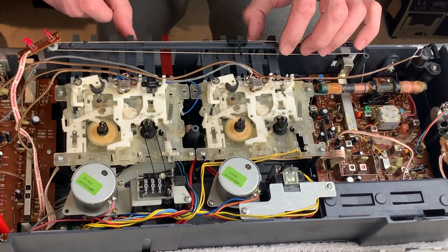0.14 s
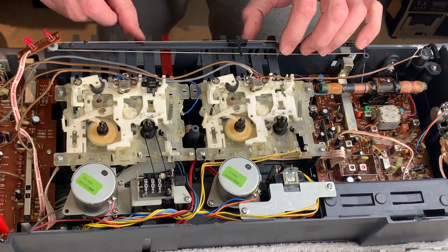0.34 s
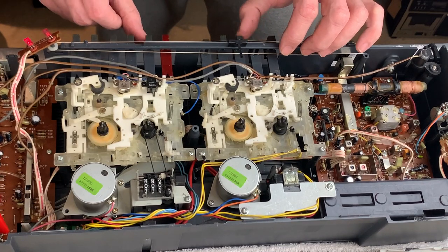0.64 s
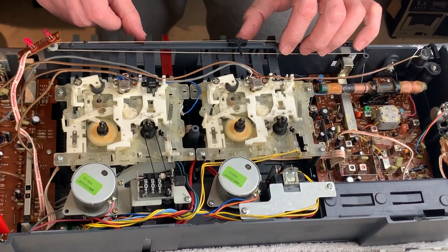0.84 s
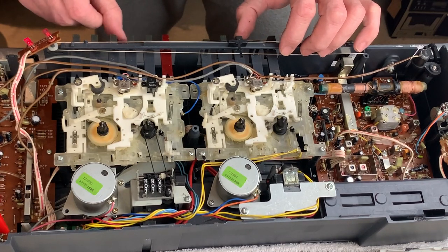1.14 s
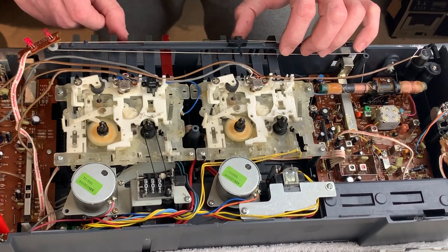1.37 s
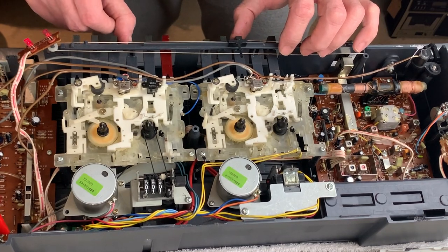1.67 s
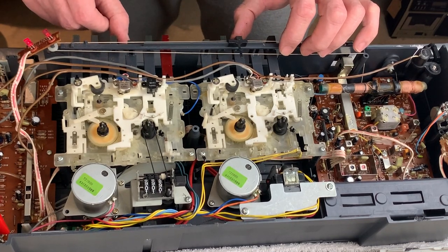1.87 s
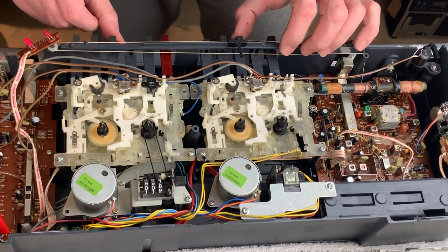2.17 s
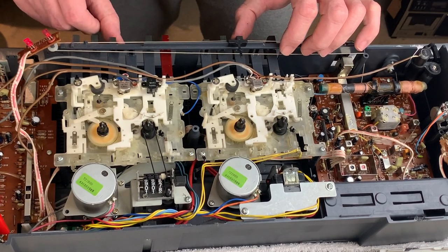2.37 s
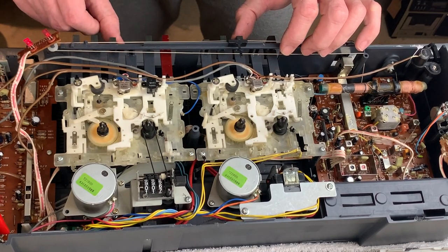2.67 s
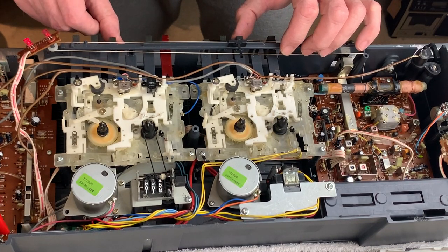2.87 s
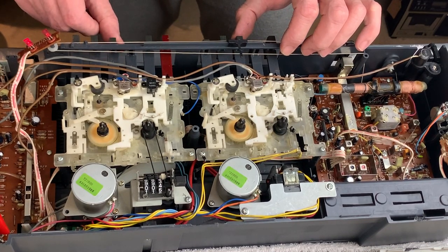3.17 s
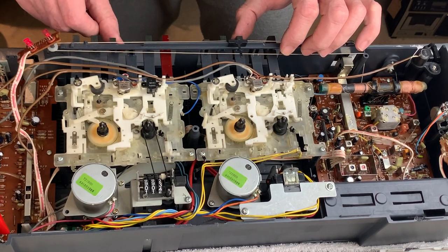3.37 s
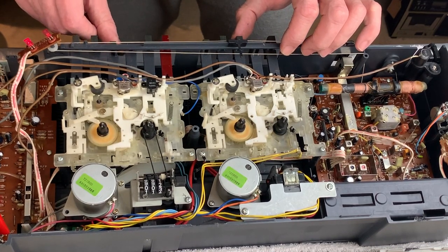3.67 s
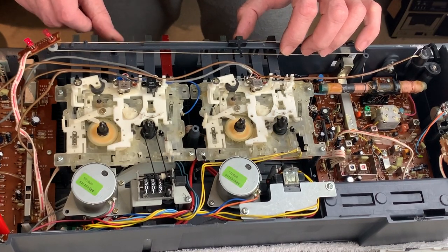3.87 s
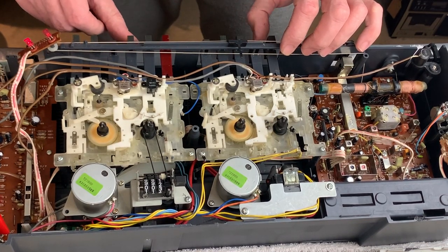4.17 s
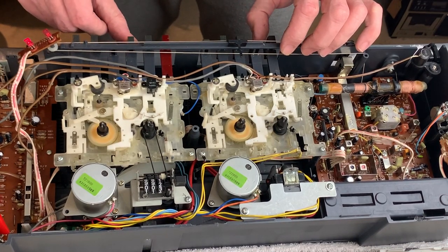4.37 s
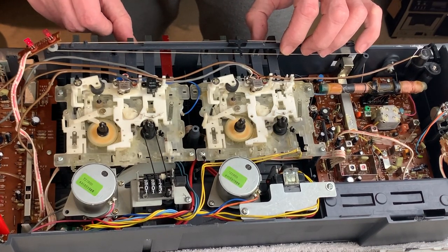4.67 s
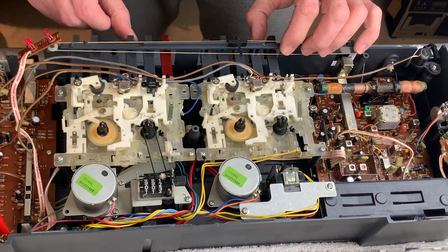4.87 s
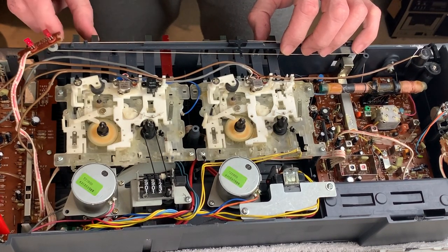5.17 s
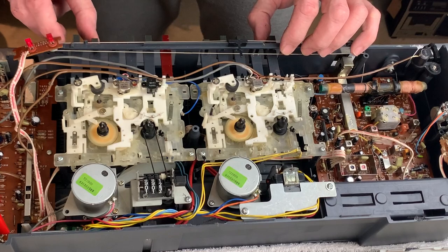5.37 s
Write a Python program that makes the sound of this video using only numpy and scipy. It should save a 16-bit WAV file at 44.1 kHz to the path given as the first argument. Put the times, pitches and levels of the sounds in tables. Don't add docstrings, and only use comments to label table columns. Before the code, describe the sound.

Inside an opened cassette deck, a faint motor whine runs while keys are tapped, then three sharp plastic-metal latch clacks sound, the second loudest.

```python
import sys
import numpy as np
from scipy import signal
from scipy.fft import rfft, irfft, next_fast_len
from scipy.io import wavfile
from scipy.ndimage import map_coordinates

SR = 44100
rng = np.random.default_rng(int(sys.argv[2]) if len(sys.argv) > 2 else 0)


def store_pcm(level_fs):
    pcm = np.round(np.clip(level_fs, -1, 1) * 32767).astype(np.int16)
    wavfile.write(sys.argv[1], SR, np.atleast_2d(pcm).T)


def field_ratio(decibels):
    return 10 ** (np.asarray(decibels, dtype=float) / 20)


N = 243211

# start in seconds, snap peak in dB, plastic in dB,
# chassis in dB, decay t60 in seconds.
ENGAGE = [(1.395, -56, -70, -55.5, 1), (1.4155, -50, -68.5, -51.5, 0.043), (1.4285, -36.5, -57, -56, 0.016),
          (1.4895, -54.5, -63.5, -44.5, 0.026), (1.4975, -38, -64.5, -53.5, 0.016),
          (1.526, -54, -63, -64, .06), (1.553, -37, -42.5, -44, 0.047), (1.5768, -10, -36, -30.5, 0.016),
          (1.584, -32, -34, -37.5, .062), (1.60, -46.5, -50.5, -48, 0.044), (1.63, -50, -56, -49, 0.05)]
RELEASE = [
    (3.570, -38.5, -36.5, -55, .15),
    (3.576, -29.5, -29, -45, .04),
    (3.579, -15, -21, -25.5, .04),
    (3.5815, 3, -18.5, -10.5, .02),
    (3.588, -12.5, -22.5, -18.5, .055),
    (3.6175, -16, -34.5, -36.5, .02),
    (3.631, -30.5, -40, -38, 0.036),
    (3.648, -36, -45.5, -43, 0.036),
    (3.680, -39, -51.5, -49.5, 0.06),
]
SWITCH = [
    (5.239, -54, -80.5, -51, 0.028),
    (5.312, -39, -52, -69, .14),
    (5.3205, -20, -36, -43, .045),
    (5.3272, -0.5, -23, -11, .02),
    (5.337, -20, -24, -43, .055),
    (5.36, -38, -47, -51, .04),
    (5.403, -41, -47, -48, .04),
    (5.4875, -36, -55, -56, 0.024),
]
# frequency in Hz, level in dB, decay t60 in seconds.
ENGAGE_RING = [(653, -48.5, 0.095), (757, 11, 0.12), (900, 8, .06), (1110, 3, 0.07), (1370, 6, 0.071),
               (1597, 0, 0.099), (1950, -42, 0.035), (2150, -23, .05)]
RELEASE_RING = [(614, -12.5, .13), (760, -17, 0.084), (850, -7, 0.19), (998, 1.5, 0.091), (1080, 0, 0.057),
                (1136, -5, .13), (1305, 6, 0.051), (1550, 1, 0.09), (1610, -2.5, 0.12), (1850, -2.5, 0.089),
                (2030, -13.5, 0.15)]
SWITCH_RING = [(584, -6, 0.13), (765, -11.5, 0.16), (863, -8, 0.17), (1050, -3.5, 0.089), (1220, -9, 0.18),
               (1505, -6, 0.05), (1574, 10, 0.035), (1680, 9, 0.04), (2180, -13, 0.12)]
# frequency in Hz, level in dB.
SNAP = [(3500, -25), (5000, -10), (6800, 0.5), (8500, -5), (10200, 0.5), (12000, -3.5), (14000, 5),
        (15400, -5), (16000, -13.5), (16800, -31.5)]
DULL = [(3500, -14), (5000, -11.5), (6500, 4), (8000, -13), (10500, -11), (12500, -19), (14500, -14.5),
        (16500, -26.5)]
PLASTIC = [(1700, -25.5), (2100, -12.5), (2500, -10.5), (2950, -2), (3400, -2.5), (4000, -3), (4900, -7.5),
           (5500, -11), (6500, -28)]
# frequency in Hz, level in dB.
WIDE = [(200, -19), (600, -8), (1500, -5.5), (2400, -1), (5000, -3.5), (7000, -7), (10000, -7.5),
        (16000, -11)]
# start in seconds, tick peak in dB, knock in dB, knock frequency in Hz,
# decay t60 in seconds.
TOUCH = [
    (.2815, -48, -48, 950, .04),
    (.3714, -80, -56, 736, 0.033),
    (.5043, -60.5, -56, 850, .041),
    (.6165, -48.5, -46, 907, 0.089),
    (.6414, -50, -50.5, 740, 0.038),
    (.9344, -63, -57, 900, 0.07),
    (1.1814, -60, -51, 640, 0.049),
    (4.7698, -49.5, -49.5, 1216, .11),
    (4.8084, -70, -45.5, 1320, .035),
]
RUB = [
    (.995, -73.5, -50.5, 1000, 0.058),
    (.468, -81.5, -51.5, 854, 0.15),
    (3.342, -95, -53.5, 770, 0.055),
    (4.405, -80, -63, 2900, 0.34),
    (4.462, -71, -57, 770, 0.13),
    (4.5, -86, -54.5, 1110, .1),
    (4.765, -64.5, -51.5, 773, .16),
    (4.815, -73.5, -57, 757, 0.11),
    (5.235, -70, -55, 1190, 0.21),
]
# frequency in Hz, level in dB, decay t60 in seconds.
SPRING = [(1393, -50, .7), (822, -56, .6), (720, -58, .5)]
# start in seconds, peak in dB, sharpness in dB, decay t60 in seconds, shudder in dB.
PUSH = [
    (0.306, -50, 2.5, 0.062, -84.5),
    (0.488, -48, -18.5, 0.11, -77.5),
    (.649, -48, -11, .19, -78),
    (1.011, -60.5, -8, 0.094, -79.5),
    (1.46, -55, -10, 0.083, -65),
    (1.643, -42, -4.5, 0.073, -78),
    (3.584, -29.5, -3, 0.14, -68.5),
    (4.8, -62, 4, .14, -78),
    (5.333, -32.5, -5.5, 0.1, -62),
]
# frequency in Hz, level in dB at sharpness 0.
BENCH_UPPER = [(188, -6), (300, -7), (390, -16)]
# start
# in seconds, peak in dB, frequency in Hz, decay t60 in seconds.
LEAN = [(1.4, -58, 60, .15), (1.54, -55, 62, .15), (.02, -64, 305, 0.097), (.39, -58, 55, .06),
        (1.689, -50.5, 78, 0.1), (2.752, -60.5, 50, 0.1), (2.84, -50.5, 52, 0.18), (3.091, -60, 42, 0.12),
        (3.252, -56.5, 48, .096), (3.665, -48, 95, 0.11), (3.72, -48, 70, .064), (5.34, -42.5, 62, 0.24),
        (5.439, -68, 70, 0.16)]
# time in seconds, transport load from 0 to 1, brush drag in dB.
MOTOR = [(0, 0.18, -5.5), (.5, 0.23, -6), (.72, 0.17, -3), (1.04, 0.3, 0), (1.25, 0, -2.5), (1.55, 0.2, 1),
         (1.9, 0.81, 1.5), (2.6, 0.85, -0.5), (2.85, 1.1, 0.5), (3.05, 0.7, 2), (3.58, 1, -0.5),
         (3.75, 0.3, 3), (3.9, 0, -1), (4.7, 0.06, -3), (5.2, 0.22, -1.5), (5.37, 0.86, 2), (5.51, 0.1, -1)]
# time in seconds, commutator rate in Hz.
SPEED = [(0, 227), (.5, 227), (.9, 224.5), (3.5, 224.5), (4.3, 224.5), (4.9, 224), (5.1, 227), (5.51, 227)]
# multiple of the commutator rate, level in dB rms.
ORDERS_DB = [(7, -74.5), (7.26, -77.5), (8, -73.5)]
FLICKER_DB = [(12.4, -92), (13.07, -92), (13.75, -95), (14.7, -94), (16, -98), (16.7, -93), (18, -100)]
# frequency in Hz, width in Hz, level in dB.
CAN = [(1086.7, 43, 1), (1350, 70, -1), (1597, 70, -0.5), (1683, 74, -1.5), (1829, 120, -5.5),
       (2767, 170, -11.5), (3166, 270, -17), (3822, 400, -19.5)]
# frequency in Hz, density in dB per Hz.
GEARS = [(480, -30), (600, -3), (680, -0.5), (800, -0.5), (920, -4.5), (1000, -0.5), (1080, -3),
         (1200, -33)]
RUMBLE = [(12, -35), (20, -13.5), (43, 4.5), (64, 0), (130, -1.5), (233, -9.5), (311, -10.5), (434, -17),
          (550, -16.5), (720, -43.5), (1210, -120)]
AIR = [(1500, -20), (2200, 0), (4000, -3), (6000, -7), (7800, -6), (8250, -36), (9000, -36), (9250, -5),
       (12700, -7), (13000, -36), (14100, -36), (14350, -6), (15750, -6), (16000, -50)]
# frequency in Hz, t60 in seconds.
ROOM = [(100, 0.33), (600, 0.19), (2000, .17), (8000, 0.14), (16000, 0.04)]
# frequency in Hz, left-right likeness.
DIFFUSE = [(60, .85), (300, 0.73), (700, 0.15), (2000, 0.028), (7000, -.2), (15000, -0.11)]
# frequency in Hz, phase in radians by which left leads.
LEAD = [(0, 0), (350, .2), (700, -.2), (1250, -.8), (1600, -.3), (1800, .6), (3200, 1.2), (4700, 3.1),
        (6700, 4.9), (8200, 4), (10200, 7.3), (12000, 5.4), (16000, .4)]
# frequency in Hz, left-right balance in dB.
SIDEWAYS = [(60, -1.5), (200, 2.5), (380, 1.5), (700, 5), (1200, 1), (1700, 8), (2400, -0.5), (4500, -10),
            (8000, 0), (15000, -0.5)]
# frequency in Hz, width in Hz, depth in dB.
NOTCHES = [(8800, 500, -12), (13550, 780, -18.5)]

FIFTH_DB, SIXTH_DB, BRUSH_DB, GEAR_DB = -68, -69.5, -64, -71
FIFTH_GAINS_DB, SIXTH_GAINS_DB, GEAR_GAINS_DB = 11, -6.5, 7
SIXTH_PER_DRAG = 0.91
RISE_S, RISE_GROWS, LONGEST_RISE_S = .001, 1.5, 0.024
CHASSIS_LOW_HZ, CHASSIS_HIGH_HZ = 520, 2125
SPRING_S = 3.59
BENCH_HZ, UPPER_T60_S, RISE_CYCLES = 117, 0.096, 0.42
SOFT_LEAD_S = .03
RUMBLE_DB, SHUDDER_RISE_S, SHUDDER_T60_S = -73.5, 0.055, .8


def unit(x):
    return x / np.sqrt(np.mean(x ** 2) + 1e-20)


def peak(x):
    return x / np.max(np.abs(x))


def along(points, hz):
    f, v = np.transpose(points)
    return np.interp(np.log(hz + 1), np.log(f + 1), v)


def curves(rows):
    s, *cols = np.transpose(rows)
    return [np.interp(np.arange(N) / SR, s, c) for c in cols]


def wobble(rate):
    n = np.arange(0, N + 16, 16)
    knots = rng.standard_normal(int(N * rate / SR) + 4)
    return np.interp(np.arange(N), n, map_coordinates(knots, [n * rate / SR]))


def filtered(x, response):
    n = x.shape[-1]
    m = next_fast_len(n + 8192)
    return irfft(rfft(x, m) * response(np.fft.rfftfreq(m, 1 / SR)), m)[..., :n]


def coloured(points):
    return lambda hz: field_ratio(along(points, hz))


def swell(t, t60, rise):
    return (1 - np.exp(-t / rise)) ** 2 * field_ratio(-60 * t / t60)


def scattered(pair):
    turn = lambda hz: np.arccos(np.clip(along(DIFFUSE, hz), -1, 1)) / 2
    mid, side = filtered(pair, lambda hz: np.array([np.cos(turn(hz)), np.sin(turn(hz))]))
    return np.array([mid + side, mid - side])


def hiss(spectrum):
    return unit(scattered(filtered(rng.standard_normal((2, N)), coloured(spectrum))))


def ports(x):
    half = lambda hz: field_ratio(along(SIDEWAYS, hz) / 2) * np.exp(.5j * np.interp(hz, *np.transpose(LEAD)))
    return filtered(x, lambda hz: np.array([half(hz), 1 / half(hz)]))


def add(out, s, shape, parts):
    n = np.arange(len(shape))
    depth_db = 4 * (1 - np.exp(-n / 350))
    clumps = field_ratio(depth_db * map_coordinates(rng.standard_normal(len(n) // 40), [n / 60]))
    for db, response in parts:
        blows = rng.standard_normal((2, len(shape))) * shape * clumps
        sound = filtered(blows, response)
        out[:, round(s * SR):][:, :len(shape)] += field_ratio(db) * sound / np.max(np.abs(sound), 1, keepdims=True)


def key(contacts, modes):
    out, t = np.zeros((2, N + SR)), np.arange(SR // 5) / SR
    damp = 2.2 / .45

    def ring(f):
        low = (f / CHASSIS_LOW_HZ) ** 6
        band = low / (1 + low) / (1 + (f / CHASSIS_HIGH_HZ) ** 6)
        return band * sum(field_ratio(db) * 1j * f / (c * c - f * f + 1j * f * damp / min(t60, .09))
                          for c, db, t60 in modes)

    for s, snap_db, plastic_db, chassis_db, t60 in contacts:
        rise = min(RISE_S * (t60 / .025) ** RISE_GROWS, LONGEST_RISE_S)
        snap = SNAP if rise < .006 else DULL
        parts = [(snap_db + 1, coloured(snap)), (plastic_db + 6, coloured(PLASTIC)), (chassis_db + 1.5, ring)]
        add(out, s - rise, swell(t, t60, rise), parts)
    return out[:, :N]


def fingers(contacts, rise, broad, plastic_db):
    out, t = np.zeros((2, N + SR)), np.arange(SR // 5) / SR
    for s, tick_db, knock_db, c, t60 in contacts:
        knock = lambda f: (1j * f * c * broad / (c * c - f * f + 1j * f * c * broad)) ** 2
        parts = [(tick_db + 2, coloured(DULL)), (tick_db + plastic_db, coloured(PLASTIC)), (knock_db + 5.5, knock)]
        add(out, s - .0015, swell(t, t60, rise), parts)
    return out[:, :N]


def spring():
    t = np.maximum(np.arange(N) / SR - SPRING_S, 0)
    return sum(field_ratio(db - 60 * t / t60) * np.sin(2 * np.pi * hz * t) for hz, db, t60 in SPRING)


def bench():
    out, t = np.zeros(N + SR), np.arange(SR // 2) / SR
    sway = 0.48 * wobble(39)[:len(t)]
    swings = [(s, db, BENCH_HZ, t60) for s, db, _, t60, _ in PUSH] + LEAN
    for s, db, sharp_db, _, _ in PUSH:
        start = s - SOFT_LEAD_S * (db < -40)
        swings += [(start, db + sharp_db + upper_db, hz, UPPER_T60_S) for hz, upper_db in BENCH_UPPER]
    for s, db, hz, t60 in swings:
        shape = peak((1 - np.exp(-t * hz / RISE_CYCLES)) ** 2 * field_ratio(-60 * (t / t60) ** 2))
        swing = np.sin(2 * np.pi * hz * t + sway) + .28 * np.sin(2 * np.pi * .7 * hz * t)
        out[round(s * SR):][:len(t)] += field_ratio(db) * shape * swing
    return out[:N]


def motor():
    load, drag_db = curves(MOTOR)
    fifth_db = FIFTH_DB + FIFTH_GAINS_DB * load
    sixth_db = SIXTH_DB + SIXTH_GAINS_DB * load + SIXTH_PER_DRAG * drag_db
    gear_db = GEAR_DB + GEAR_GAINS_DB * load
    brush_db = BRUSH_DB + drag_db
    turn = 2 * np.pi * np.cumsum(curves(SPEED)[0] * (1 + .003 * wobble(14))) / SR

    def order(k, db, blur=.9):
        return np.sqrt(2) * field_ratio(db + 3.5 * wobble(35)) * np.sin(k * turn + blur * wobble(40))

    whine = order(5, fifth_db) + order(6, sixth_db + 2) + sum(order(k, db) for k, db in ORDERS_DB)
    whine += order(3, gear_db - 8) + order(4.38, gear_db - 13)
    whine += sum(order(k, db + 3 * wobble(6), blur=2.2) for k, db in FLICKER_DB)

    def can(f):
        total = sum((-1) ** k * field_ratio(db) * 1j * f * w / (c * c - f * f + 1j * f * w)
                    for k, (c, w, db) in enumerate(CAN))
        return total * np.abs(total) ** .6

    brushes = unit(filtered(rng.standard_normal((3, N)), can))
    brush_level = field_ratio(brush_db + 1.6 * wobble(11))
    direct = ports(whine + field_ratio(-3) * brush_level * brushes[0])
    around = field_ratio(1) * brush_level * scattered(brushes[1:])
    gears = field_ratio(gear_db + 1.6 * wobble(5.8)) * field_ratio([[1.5], [-1.5]]) * hiss(GEARS)
    return direct + around + gears


def room(x):
    hz, t, z = signal.stft(rng.standard_normal((2, SR // 2)), SR, nperseg=256)
    tail = signal.istft(z * field_ratio(-60 * t / along(ROOM, hz)[:, None]), SR, nperseg=256)[1]
    late = np.pad(x, (130, 0))
    return signal.fftconvolve(late[None], tail / np.linalg.norm(tail[0]), axes=1)[:, :N]


def background():
    level, t = np.full(N + SR, field_ratio(RUMBLE_DB)), np.arange(SR) / SR
    for s, *_, db in PUSH:
        level[round(s * SR):][:SR] += field_ratio(db + 2) * swell(t, SHUDDER_T60_S, SHUDDER_RISE_S)
    rumble = level[:N] * field_ratio(5 + 0.96 * wobble(24)) * hiss(RUMBLE)
    return rumble + field_ratio(-76.5) * hiss(AIR)


def scene():
    touches = fingers(TOUCH, rise=0.00097, broad=.45, plastic_db=4.5)
    rubs = fingers(RUB, rise=0.013, broad=0.47, plastic_db=7.5)
    keys = [key(ENGAGE, ENGAGE_RING), key(RELEASE, RELEASE_RING), key(SWITCH, SWITCH_RING), touches + rubs]
    thumps = bench()
    answer = scattered(field_ratio(-7) * sum(room(k[0]) for k in keys) + field_ratio(-10) * room(thumps))
    shared, spread = sum(keys)
    width = filtered(spread, lambda hz: field_ratio(along(WIDE, hz) - 4))
    direct = ports(shared + thumps + spring()) + [[1], [-1]] * width
    return direct + answer + motor() + background()


def band_limit(x):
    return signal.sosfilt(signal.butter(12, 16750, fs=SR, output="sos"), x)


def record(dry):
    def notched(f):
        notches_db = sum(db * np.exp(-((f - c) / w) ** 2) for c, w, db in NOTCHES)
        return field_ratio(notches_db) * f ** 4 / (f ** 4 + 37.0 ** 4)

    return band_limit(np.clip(filtered(dry, notched), -1, 1))


dry = scene()
out = record(dry)
store_pcm(out)
```